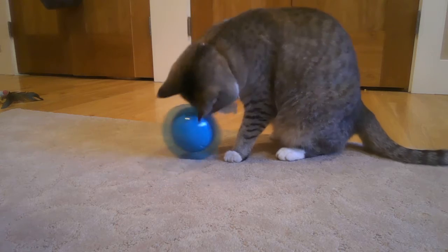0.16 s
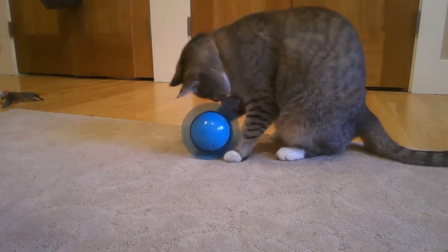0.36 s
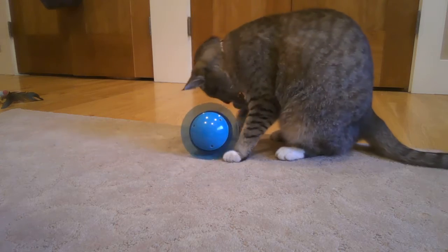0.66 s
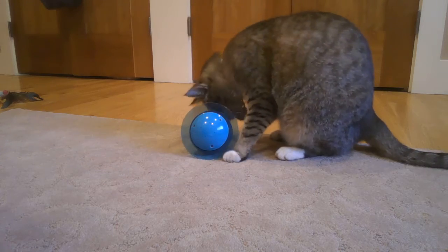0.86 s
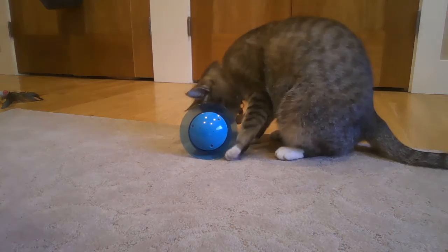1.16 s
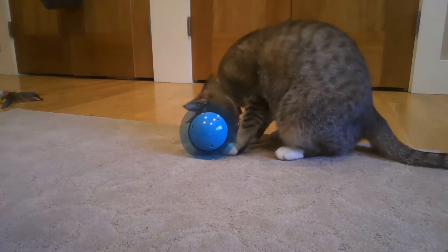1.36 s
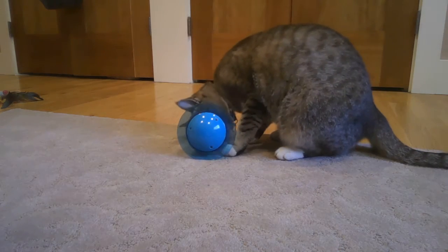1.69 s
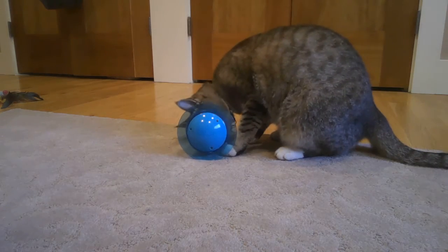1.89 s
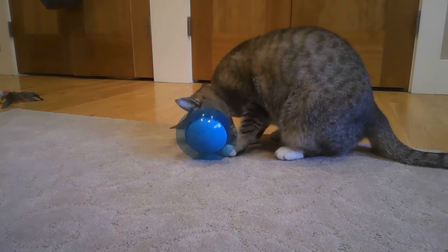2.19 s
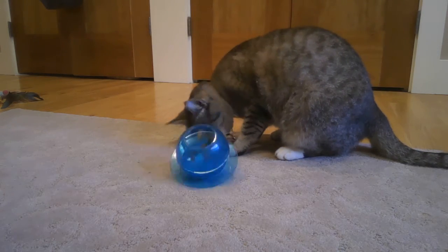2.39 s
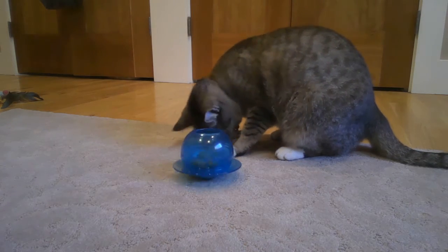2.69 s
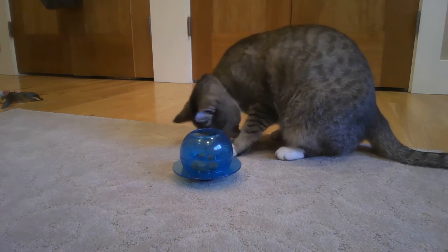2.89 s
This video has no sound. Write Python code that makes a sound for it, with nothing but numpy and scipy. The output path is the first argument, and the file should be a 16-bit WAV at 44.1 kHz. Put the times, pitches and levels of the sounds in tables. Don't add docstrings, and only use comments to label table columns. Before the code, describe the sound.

Dry treats rattle and clack inside a hollow plastic ball in two short bursts on carpet.

```python
import sys
import numpy as np
from scipy import signal
from scipy.fft import rfft, irfft
from scipy.io import wavfile
from scipy.ndimage import uniform_filter1d

SR = 44100
rng = np.random.default_rng(int(sys.argv[2]) if len(sys.argv) > 2 else 0)


def attenuation_scalar(level_db):
    decades = np.asarray(level_db, float) / 20
    return 10 ** decades


def dump(signal):
    limited = np.clip(np.atleast_2d(signal).T, -1, 1)
    pcm = np.round(limited * 32767).astype(np.int16)
    wavfile.write(sys.argv[1], SR, pcm)


N = 134505

# start in seconds, peak level in dB, shell ring against crack in dB,
# upper shell modes against lower in dB, centre of the crack in Hz.
FIRST_ROLL_KNOCKS = [(.0725, -37, -26, 0, 5000), (.175, -30.5, -37.5, 0, 5400),
                     (.2452, -33, -5.5, -13.5, 3400), (.2622, -28.5, -15.5, -12, 3984),
                     (.2697, -33, -9.5, -13, 4300), (.279, -50, 7.5, -16, 4500),
                     (.2903, -25.5, -7.5, -8, 4400), (.3005, -23.5, -16.5, -6.5, 5000),
                     (.314, -15, -23.5, -4, 5700), (.317, -24, -19.5, -4.5, 6800),
                     (.3213, -18.5, -21.5, -4, 5900), (.3295, -23, -18.5, -1, 4400),
                     (.3318, -15.5, -18, -6.5, 4700), (.334, -20.5, -20, -4.5, 6200),
                     (.3405, -21, -18.5, -4, 4600), (.3425, -13, -24, -4, 5900),
                     (.3608, -16.5, -24, -4, 5500), (.369, -23, -6.5, -4.5, 3720),
                     (.374, -22, -13.5, -4, 6500), (.3895, -12.5, -16, -4.5, 5600),
                     (.3922, -14, -14.5, -3.5, 5550), (.3965, -7, -26.5, -5, 5560),
                     (.4095, -25, -12, -4.5, 5360), (.4145, -21.5, -17, -5, 5900),
                     (.4235, -27, -20, -5, 5500), (.4305, -21, -18.5, 0, 5400),
                     (.4393, -25, -11.5, 0.5, 5540), (.4497, -23.5, -19, 4, 4940),
                     (.46, -28.5, -11, 2.5, 4500), (.4715, -13.5, -20, -3.5, 5800),
                     (.4848, -26.5, -15.5, -1, 5740), (.4975, -26, -13.5, -2.5, 5000),
                     (.502, -18.5, -23.5, 7, 6300)]
# start in seconds, peak level in dB, shell ring against crack in dB,
# upper shell modes against lower in dB, centre of the crack in Hz.
TIPPING_KNOCKS = [(2.4518, -16.5, -18.5, -3, 4530), (2.4545, -19, -22, 0.5, 5000),
                  (2.457, -25, -21, -0.5, 5800), (2.4648, -14.5, -16.5, -2, 5300),
                  (2.479, -24.5, -22, 1, 5400), (2.4827, -15, -29, -0.5, 5000),
                  (2.4922, -14.5, -14, -5.5, 4460), (2.4955, -19, -19, -4.5, 5000),
                  (2.5052, -20.5, -9, -0.5, 4600), (2.5072, -20, -9, 1.5, 6800),
                  (2.517, -27, -10, -5, 5320), (2.5532, -20.5, -11.5, -6, 4800), (2.5669, 5, -24, 0, 5155),
                  (2.575, -10.5, -19.5, -0.5, 6520), (2.5794, -5, -27, -0.5, 6300),
                  (2.5806, 1, -32.5, -0.5, 6460), (2.5904, -5, -27.5, -0.5, 6800),
                  (2.5918, 0, -30, -4, 7250), (2.5937, -3, -30.5, 0, 5560), (2.596, -5.5, -32, -1.5, 5810),
                  (2.5976, -1.5, -30.5, -0.5, 5300), (2.5997, -4.5, -30, -0.5, 7300),
                  (2.6028, -1.5, -29.5, -1, 6200), (2.6055, -6, -24.5, 1, 6600),
                  (2.6088, -8.5, -30, -1, 5400), (2.6132, -1.5, -20.5, -0.5, 5110),
                  (2.6163, -9, -25, -1.5, 5400), (2.6208, -13, -24.5, 0.5, 5200),
                  (2.6241, -5, -11, 7, 5080), (2.6263, -5.5, -21, -0.5, 6800),
                  (2.6338, -15, -19.5, -6, 5220), (2.656, -17, -18.5, -5, 5480)]
# start in seconds, peak level in dB, shell ring against crack in dB,
# upper shell modes against lower in dB, centre of the crack in Hz.
SETTLING_KNOCKS = [(2.669, -21, -10, -7.5, 5000), (2.705, -18.5, -12.5, -0.5, 4700),
                   (2.71, -14.5, -5, -3, 4690), (2.7364, -22.5, 3, 5, 5000), (2.7378, -10, -11.5, -5, 4960),
                   (2.7492, -26.5, -7.5, -7.5, 5210), (2.758, -30.5, 4, -10.5, 4990),
                   (2.7703, -31, 6.5, -11, 4810), (2.7835, -35.5, 6, -3, 5000),
                   (2.7897, -9, -18.5, 5, 5300), (2.7984, -17.5, -16, 13, 4800),
                   (2.8011, -6.5, -23, 5, 5900), (2.8152, -8.5, -9.5, 2, 5100), (2.847, -30, 1, -18, 5130),
                   (2.8596, -27.5, -13, -1, 5330)]
# pitch in Hz, level in dB, time to fade by 60 dB in seconds.
SHELL_ON_SIDE = [(930, -17, 0.025), (1190, -4, 0.009), (1292, 2.5, 0.02007), (1517, -0.5, 0.013),
                 (1892, -9.5, 0.016), (2450, -13, 0.015), (2946, -1.5, 0.015), (3715, -3.5, 0.02)]
# pitch in Hz, level in dB, time to fade by 60 dB in seconds.
SHELL_UPRIGHT = [(860.5, -6, 0.07), (1160, 0, .025), (1330, 3.5, 0.027), (1436, -0.5, .025),
                 (1595, 0, 0.024), (1971, -15.5, 0.032), (2305, -20.5, 0.026), (2798, -1.5, .045),
                 (2866, -12, 0.057), (3540, -14, 0.022)]
# pitch in Hz, level in dB.
WALL_MODES = [(3300, -3.5), (3650, -1.5), (4050, -6), (4450, 0), (4750, -7.5), (5100, 1), (5530, -0.5),
              (5900, -1.5), (6180, -2.5), (6500, -4), (6900, -1.5), (7200, 0.5), (7420, -2)]
# time in seconds, level in dB.
FIRST_STIR_LEVEL = [(.275, -71), (.31, -46), (.34, -37.5), (.4, -42), (.45, -40.5), (.52, -46), (.56, -56)]
# time in seconds, level in dB.
SECOND_STIR_LEVEL = [(2.445, -63.5), (2.455, -37.5), (2.53, -36.5), (2.56, -65), (2.6, -21.5),
                     (2.63, -38.5), (2.7, -35.5), (2.85, -46.5), (2.92, -58)]
# start in
# seconds, length in seconds, level in dB, pitch in Hz, width in Hz.
SOFT_NOISES = [(0, .19, -62.5, 5700, 600), (.044, .12, -57, 4256, 250), (.066, .071, -67.5, 1940, 154),
               (.052, .04, -66.5, 1300, 148), (.93, .24, -71.5, 1780, 240), (1.028, .14, -78, 2420, 120),
               (1.032, .13, -73.5, 4140, 250), (1.18, .15, -75, 1818, 147), (1.323, .092, -78, 2010, 90),
               (2.29, .2, -54.5, 1822, 200), (2.296, .15, -66, 2380, 144), (2.327, .052, -73, 3520, 119),
               (2.383, .066, -65, 7460, 250), (2.389, .04, -69, 6230, 313), (2.416, .09, -54.5, 475, 40),
               (2.39, .06, -69, 6800, 250), (.285, .09, -55, 750, 40), (.406, .076, -52, 700, 50),
               (2.56, .12, -47, 670, 150), (1.56, .1, -72, 897, 900), (.46, .15, -60, 3620, 160),
               (.49, .09, -58, 1850, 250), (0, .16, -67, 7400, 300), (2.87, .13, -60, 5000, 1200)]
# start in seconds, level in dB, pitch in Hz, time to fade by 60 dB in seconds.
TAG_TICKS = [
    (1.574, -51.5, 6760, 0.11),
    (1.62, -69, 6860, 0.12),
]
# frequency in Hz, level in dB per Hz.
RUMBLE_COLOUR = [(25, -47), (60, -29.5), (140, -0.5), (300, -16.5), (700, -23), (1300, -28), (1600, -36.5),
                 (7500, -37)]
# time in seconds, level in dB.
RUMBLE_LEVEL = [(0, -61), (.6, -61.5), (.85, -66.5), (1.5, -67), (1.62, -63), (1.9, -67), (2.25, -67),
                (2.38, -59.5), (2.7, -70.5), (3.05, -62)]

CRACK_T60_S, CRACK_SPREAD_OCT, CRACK_SCATTER_DB = 0.012, 0.41, 3
CONTACT_S, CRACK_RISE_S = 0.0003, 0.0003
NARROWING = 0.2
SHELL_DB, SHELL_SCATTER_DB, SHELL_RISE_S = 5.5, 4, 0.0013
SHELL_WOBBLE_HZ, UPPER_FROM_HZ = 14, 1800
TICKS_PER_S, TICK_SHELL_DB = 780, -9.5
ROOM_DB, ROOM_GAP_S, ROOM_SPLIT_HZ = -9.5, 0.0043, 7020
ROOM_T60_S, ROOM_BRIGHT_T60_S = 0.25, 0.13
GATE_DB, OVERLOAD, LOW_CUT_HZ = -84, 0.9, 825
RUMBLE_BOOST_DB = 2.5
TOP_HZ, CEILING, HISS_DB = 7488, 0.993, -83


def curve(rows):
    return np.interp(np.arange(N) / SR, *np.transpose(rows))


def rms_one(x):
    return x / np.sqrt(np.mean(x ** 2) + 1e-20)


def ring(clicks, hz, t60):
    r = attenuation_scalar(-60 / (t60 * SR))
    w = 2 * np.pi * hz / SR
    return signal.lfilter([0, np.sin(w)], [1, -2 * r * np.cos(w), r * r], clicks + 1e-18)


def press_in(t, rise_s):
    return 1 - np.exp(-(t / rise_s) ** 2)


def wall_crack(t, peak_db, centre_hz):
    hz, db = np.transpose(WALL_MODES)
    count = len(hz)
    spread_oct = CRACK_SPREAD_OCT * attenuation_scalar(peak_db) ** NARROWING
    near = np.exp(-0.5 * (np.log2(hz / centre_hz) / spread_oct) ** 2)
    lag = np.maximum(t - CONTACT_S * np.abs(rng.standard_normal(count)), 0)
    level_db = db + CRACK_SCATTER_DB * rng.standard_normal(count) - 60 * lag / CRACK_T60_S
    bent_hz = hz * (1 + 0.019 * rng.standard_normal(count))
    tones = near * attenuation_scalar(level_db) * press_in(lag, CRACK_RISE_S) * np.sin(2 * np.pi * bent_hz * lag)
    crack = np.sum(tones, axis=1)
    return crack / np.abs(crack).max()


def shell_ring(t, upper_db, shell):
    hz, db, t60 = np.transpose(shell)
    count = len(hz)
    start_db = db + upper_db * (hz > UPPER_FROM_HZ) + SHELL_SCATTER_DB * rng.standard_normal(count)
    bent_hz = hz + SHELL_WOBBLE_HZ * rng.standard_normal(count)
    tones = attenuation_scalar(start_db - 60 * t / t60) * press_in(t, SHELL_RISE_S) * np.sin(2 * np.pi * bent_hz * t)
    body = np.sum(tones, axis=1)
    return body / np.abs(body).max()


def knocks(rows, shell):
    out = np.zeros(N + SR)
    t = np.arange(3000)[:, None] / SR
    for s, peak_db, ring_db, upper_db, centre_hz in rows:
        crack = wall_crack(t, peak_db, centre_hz)
        body = shell_ring(t, upper_db, shell)
        i = int(s * SR)
        out[i:i + len(t)] += attenuation_scalar(peak_db) * (crack + attenuation_scalar(ring_db + SHELL_DB) * body)
    return out[:N]


def stir(rows, shell):
    height = attenuation_scalar(3.6 * np.minimum(rng.exponential(1, N), 4))
    happens = rng.random(N) < TICKS_PER_S / SR
    ticks = height * rng.choice([-1, 1], N) * happens
    dealt = rng.integers(0, len(WALL_MODES), N)
    wall = np.zeros(N)
    for k, (hz, db) in enumerate(WALL_MODES):
        wall += attenuation_scalar(db) * ring(ticks * (dealt == k), hz, CRACK_T60_S)
    body = np.zeros(N)
    for hz, db, t60 in shell:
        body += attenuation_scalar(db) * ring(ticks * rng.standard_normal(N), hz, t60)
    before = (rows[0][0] - 0.01, -140)
    after = (rows[-1][0] + 0.01, -140)
    level = attenuation_scalar(curve([before] + list(rows) + [after]))
    return level * (rms_one(wall) + attenuation_scalar(TICK_SHELL_DB) * rms_one(body))


def soft_noises():
    out, t = np.zeros(N), np.arange(N) / SR
    for s, length, db, hz, width_hz in SOFT_NOISES:
        t60 = np.log(1000) / np.pi / width_hz
        once = ring(rng.standard_normal(N), hz, t60)
        noise = rms_one(ring(once, hz, t60))
        swell = np.sin(np.pi * np.clip((t - s) / length, 0, 1)) ** 0.74
        out += attenuation_scalar(db) * noise * swell
    return out


def tag():
    out = np.zeros(N)
    for s, db, hz, t60 in TAG_TICKS:
        click = np.zeros(N)
        click[int(s * SR)] = attenuation_scalar(db)
        pair = ring(click, hz, t60) + 0.33 * ring(click, hz + 80, t60 * 0.64)
        out += ring(pair, hz, 0.008) / 20
    return out


def room(x):
    t = np.arange(SR // 2) / SR
    noise = rng.standard_normal(len(t))
    dull = signal.sosfilt(signal.butter(2, ROOM_SPLIT_HZ, fs=SR, output="sos"), noise)
    bright = signal.sosfilt(signal.butter(2, ROOM_SPLIT_HZ, "high", fs=SR, output="sos"), noise)
    fading = dull * attenuation_scalar(-60 * t / ROOM_T60_S)
    echo = fading + bright * attenuation_scalar(-60 * t / ROOM_BRIGHT_T60_S)
    echo = echo * np.clip(t / ROOM_GAP_S, 0, 1) ** 2
    return attenuation_scalar(ROOM_DB) * signal.fftconvolve(x, echo / np.sqrt(np.sum(fading ** 2)))[:N]


def suppress(x):
    _, _, z = signal.stft(x, nperseg=512)
    power = uniform_filter1d(np.abs(z) ** 2, size=5, axis=0)
    power = uniform_filter1d(power, size=3, axis=1)
    gain = power / (power + attenuation_scalar(GATE_DB) ** 2)
    return signal.istft(z * gain, nperseg=512)[1][:N]


def air():
    hz = np.maximum(np.arange(N // 2 + 1) * SR / N, 1)
    colour_hz, colour_db = np.transpose(RUMBLE_COLOUR)
    shape = attenuation_scalar(np.interp(np.log(hz), np.log(colour_hz), colour_db))
    rumble = irfft(rfft(rng.standard_normal(N)) * shape, N)
    return attenuation_scalar(curve(RUMBLE_LEVEL) + RUMBLE_BOOST_DB) * rms_one(rumble)


def scene():
    ball = knocks(FIRST_ROLL_KNOCKS, SHELL_ON_SIDE) + stir(FIRST_STIR_LEVEL, SHELL_ON_SIDE)
    ball = ball + knocks(list(TIPPING_KNOCKS) + list(SETTLING_KNOCKS), SHELL_UPRIGHT)
    ball = ball + stir(SECOND_STIR_LEVEL, SHELL_UPRIGHT)
    ball = ball + suppress(room(ball))
    ball = ball / (1 + np.abs(ball / OVERLOAD) ** 4) ** (1 / 4)
    ball = signal.sosfilt(signal.butter(8, LOW_CUT_HZ, "high", fs=SR, output="sos"), ball)
    return (ball + soft_noises() + tag() + air())[None]


def band_limit(x):
    return signal.sosfilt(signal.butter(12, 15750, fs=SR, output="sos"), x)


def record(dry):
    x = signal.sosfilt(signal.ellip(10, 0.5, 55, TOP_HZ, fs=SR, output="sos"), dry)
    top = CEILING * np.abs(x).max()
    x = np.clip(x, -top, top) + attenuation_scalar(HISS_DB) * rng.standard_normal(dry.shape)
    return band_limit(x)


dry = scene()
out = record(dry)
dump(out)
```